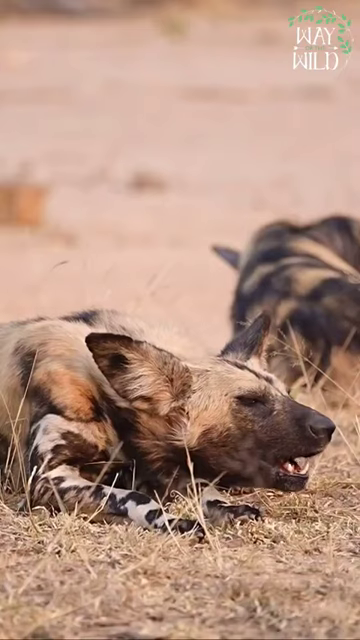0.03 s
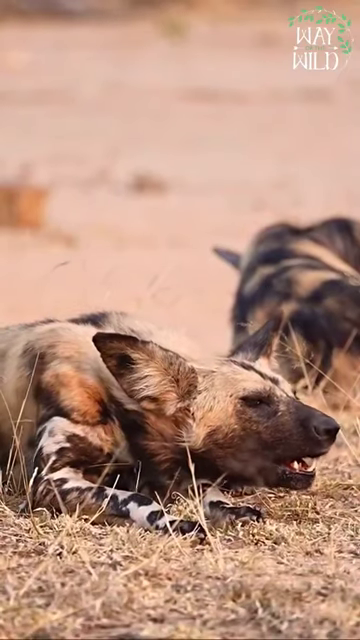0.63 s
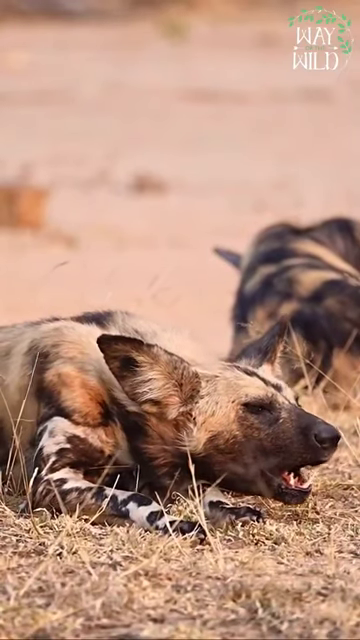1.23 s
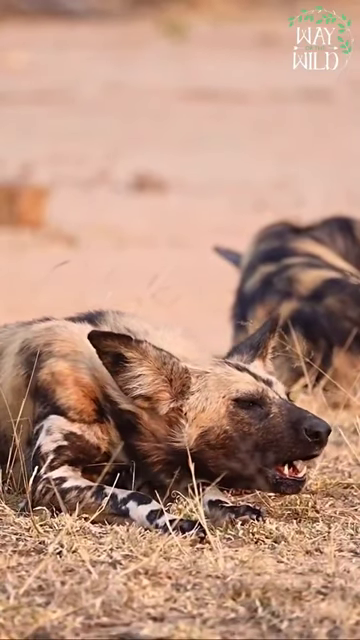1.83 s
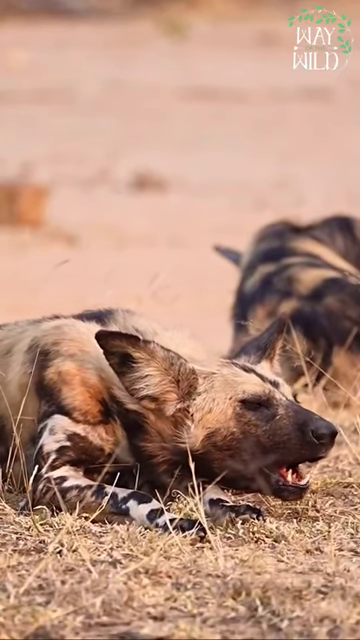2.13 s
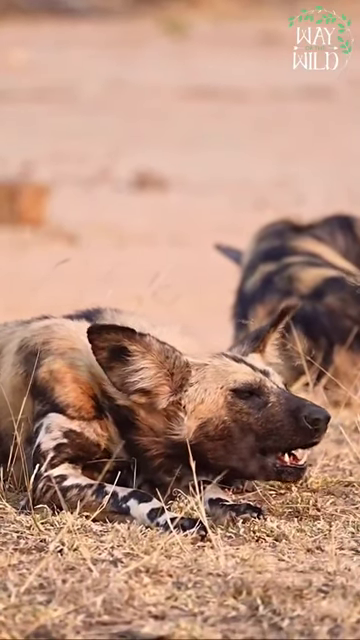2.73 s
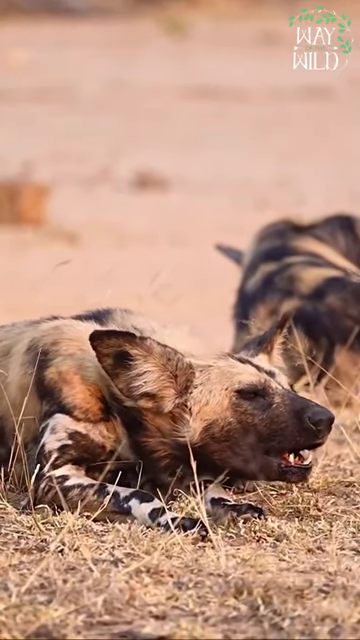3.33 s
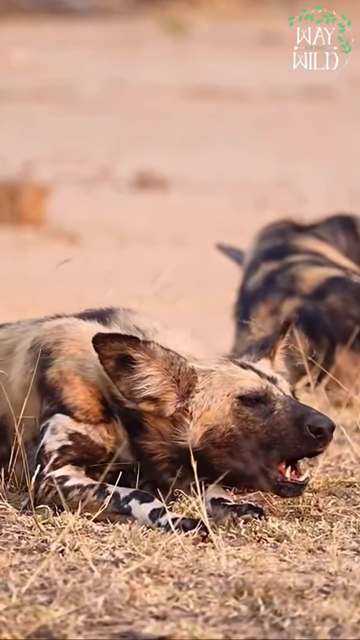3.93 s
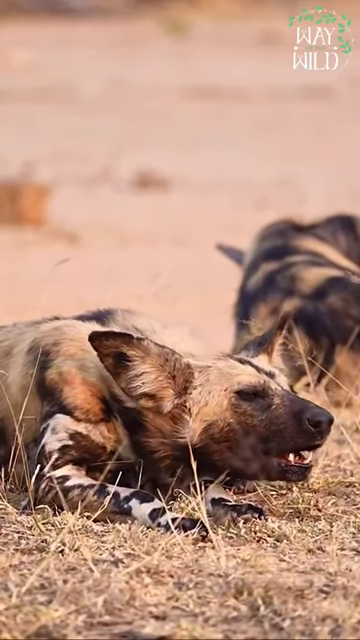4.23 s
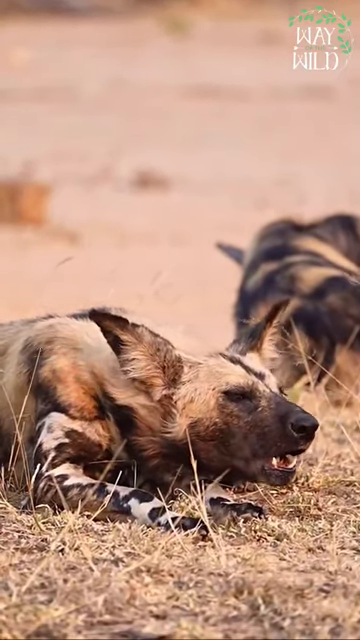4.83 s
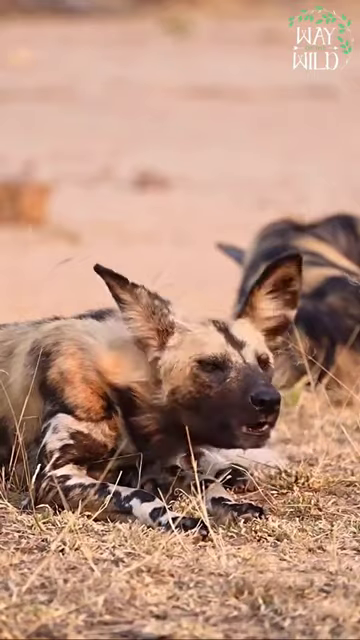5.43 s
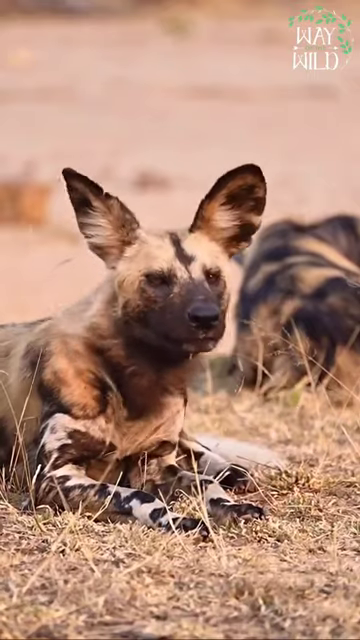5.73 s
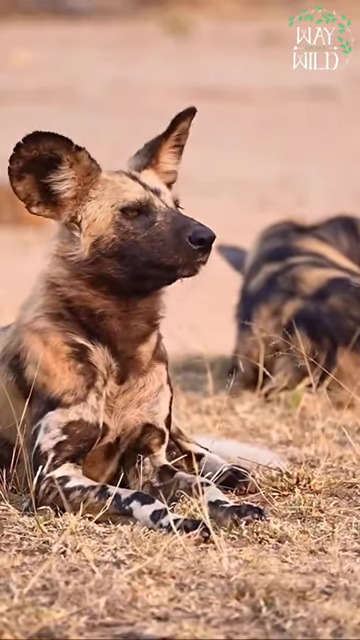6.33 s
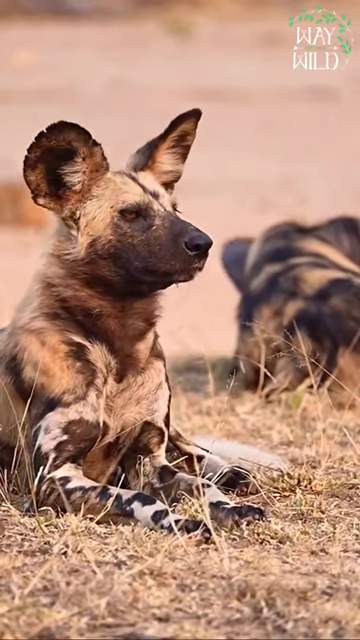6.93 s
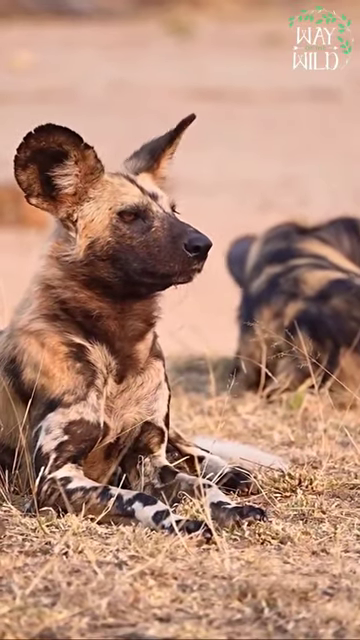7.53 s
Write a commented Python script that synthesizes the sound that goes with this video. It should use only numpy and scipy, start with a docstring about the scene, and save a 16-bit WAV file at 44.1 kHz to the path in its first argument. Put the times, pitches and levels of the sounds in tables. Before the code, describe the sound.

A wild dog gives six clear, evenly spaced hoots over low outdoor rumble, then whines briefly, leaving faint birds and a distant dove.

```python
"""Over a low rumble of bush air, we come in on a wild dog in mid-hoot, lying in dry grass, muzzle low. It hoots
six times: its vocal folds tighten into an arched, nearly pure tone with a thin reedy edge, then let go with a
puff and nasal squeaks. The bush echoes it; small birds call and dry stalks snap. After the softer last hoot it
whines and sits up in a faint swell of rustling. At about 5.9 s the background quickly gives way to a stiller
bed under the small birds and a far dove."""
import sys
import numpy as np
from scipy import signal
from scipy.fft import rfft, irfft, next_fast_len
from scipy.io import wavfile
from scipy.ndimage import uniform_filter1d

SR = 44100
rng = np.random.default_rng(int(sys.argv[2]) if len(sys.argv) > 2 else 0)


def unload_wav(signal):
    """Save mono or channel-first audio to the path in sys.argv[1] as 16-bit WAV at rate SR, clipped to [-1, 1]."""
    wavfile.write(
        sys.argv[1],
        SR,
        np.round(np.clip(np.atleast_2d(signal).T, -1, 1) * 32767).astype(np.int16),
    )


N = 338247
TIME = np.arange(N) / SR

# noise colours of the bed (air under the hoots, the stiller bed after 5.9 s, drone, rustle): f/Hz, level/dB
AIR_COLOUR = [(20, -5), (50, 4), (85, -7), (170, -3), (260, -12.5), (360, -15.5), (550, -12), (900, -18.5),
              (1400, -11), (1900, -19), (2700, -22.5), (4000, -37), (6500, -40.5), (15000, -42)]
STILL_COLOUR = [(20, -3), (52, 6), (90, -6), (210, 3), (320, -10.5), (510, -18.5), (720, -14.5), (900, -27),
                (1500, -21.5), (2200, -27.5), (3200, -29.5), (4500, -39.5), (8000, -41.5), (15000, -46.5)]
DRONE_COLOUR = [(90, -46), (135, -10.5), (160, -3.5), (190, -15.5), (300, -43.5), (900, -81)]
RUSTLE_COLOUR = [(200, -7.5), (550, 5), (1100, -8.5), (1750, 3.5), (2500, -11), (3400, -8.5), (5000, -21),
                 (7000, -14.5), (9200, -18.5), (10300, -28.5), (15000, -29.5)]
# fader rides (the later, stiller bed, drone coming and going, rustle as the dog gets up): t/s, level/dB
STILL_RIDE = [(5.9, 1), (6.8, 2.5), (7.2, 3), (7.45, 0.5), (7.67, 1)]
DRONE_RIDE = [(.7, -57.5), (.9, -47.5), (1.1, -68.5), (2.6, -66), (3.0, -49), (3.8, -53), (4.2, -53.5),
              (5.9, -71)]
RUSTLE_RIDE = [(0, -70), (2.7, -66), (3.9, -51.5), (4.3, -54), (4.8, -50), (5.25, -44), (5.45, -49.5),
               (5.9, -50.5)]
# stereo placement of the early bed, the later stiller bed and the voice: f/Hz, left minus right/dB
AIR_PAN = [(60, 0.0), (150, 0.0), (380, -2), (950, -1.5), (2380, -5), (5980, -6), (15000, -2.5)]
STILL_PAN = [(60, 0.0), (180, -1.5), (550, -3.5), (1650, -5), (4970, -5), (15000, 0)]
VOICE_PAN = [(600, -3.0), (1200, -3.6), (1800, -7), (2400, -10), (3600, -10), (5400, -13), (7500, -11),
             (13000, -7)]
# noise image, mono in the bass and wide on top: f/Hz, left-right correlation
CORRELATION = [(100, 1), (200, 1), (400, 0.84), (1000, 0.73), (2000, 0.49), (5000, 0.11), (12000, 0.087)]
# dry stalks snapping: t/s, level/dB, time to fall 20 dB/s
STALK_SNAPS = [(2.35, -43.5, 0.046), (3.468, -43, 0.043), (5.495, -41.5, 0.028), (5.595, -49, 0.051),
               (5.65, -45, 0.061)]
# noise colours of a snap, the throat's opening tick and the closing puff: f/Hz, level/dB
SNAP_COLOUR = [(500, -38), (1200, -33), (1650, 13.5), (2300, 2), (3200, 2), (4500, -28), (12000, -25)]
TICK_COLOUR = [(200, -19.5), (750, 4.5), (1400, -13), (3000, -30.5), (16000, -54.5)]
PUFF_COLOUR = [(300, -7), (600, -1), (800, 5), (1100, -11), (1800, -7), (3000, -20.5), (4500, -23.5),
               (5700, -17), (7200, -15.5), (8200, -15.5), (9300, -37), (14000, -20), (16000, -34)]
# reverb tail of the bush: f/Hz, time to fall 60 dB/s
BUSH_DECAY = [(300, 1.0), (600, 0.77), (1800, 0.28), (5000, 0.36), (12000, 0.36)]
# slapback off nearby banks and trunks: delay/s, level/dB
SLAPBACKS = [(.043, -32.5), (.088, -37.5), (.15, -31), (.27, -41.5)]
# a bird's down-slurs, steep and then flattening: t/s, length/s, top f/Hz, level/dB
DOWN_SLURS = [(0.821, .06, 4130, -63.5), (1.047, 0.075, 4110, -50), (1.16, 0.027, 5550, -50.5),
              (1.268, 0.11, 5260, -50), (3.376, .045, 6700, -67), (3.465, 0.036, 5930, -62),
              (3.489, 0.059, 4430, -56), (3.657, 0.065, 4500, -57), (6.279, 0.034, 5620, -51.5),
              (6.302, 0.079, 4670, -56), (6.58, 0.048, 5770, -56), (6.709, 0.025, 5260, -54),
              (6.757, 0.068, 4200, -64), (6.83, 0.027, 5150, -60), (6.921, .03, 4770, -59.5),
              (6.95, .049, 3100, -60), (7.055, 0.048, 5800, -58)]
# its up-slurs: t/s, starting f/Hz, level/dB
UP_SLURS = [(5.95, 4740, -66.5), (6.105, 5000, -68), (6.195, 4900, -66), (6.64, 3700, -62),
            (7.095, 3280, -62)]
# nearly flat piping notes: t/s, length/s, f/Hz, level/dB
PIPING_NOTES = [(0.53, 0.06, 3130, -61), (1.529, 0.035, 6100, -68), (2.359, 0.28, 2600, -57.5),
                (4.127, .053, 5000, -63.5), (4.425, .055, 4950, -62.5), (5.926, 0.28, 3290, -64),
                (6.205, 0.042, 3340, -56), (6.801, 0.043, 3280, -55), (7.186, 0.13, 2600, -59)]
# a far dove's coos: t/s, length/s, level/dB
DOVE_COOS = [(6.021, 0.12, -53.5), (6.202, 0.19, -57), (6.379, .18, -58), (6.599, 0.17, -54),
             (6.763, 0.39, -58), (7.0, 0.33, -56.5)]
# hoots: t/s, length/s, f/Hz, level/dB, scoop/s, release/s, treble trim/dB, squeak/dB, echo send/dB
DOG_HOOTS = [(0.05, 0.37, 600.7, -12, .05, 0.072, -2.5, -58, 0.5),
             (0.959, 0.358, 602.7, -12.3, 0.052, 0.049, 0, -48.5, -1.5),
             (1.839, 0.38, 603.7, -12, 0.056, 0.095, 0, -49, -2),
             (2.781, .372, 608, -11.9, .053, .19, 2.5, -43, 1),
             (3.68, .363, 606, -11, .052, .2, 0.5, -41, 2),
             (4.74, 0.486, 581.3, -18, .056, 0.066, 1.5, -49, -0.5)]
# throat EQ on the overtones, jaws open and nearly shut: f/Hz, level/dB, change across a hoot/dB
JAWS_OPEN = [(1520, -1.5, -1.5), (1800, -24, -3.5), (2395, -38, 7), (3020, -51.5, -1), (3480, -29, -8.5),
             (3720, -42, 1), (5300, -47, 14.5), (5470, -37, 10), (6240, -44.5, 18), (6200, -51.5, -5.5),
             (7630, -66.5, 4.5), (7890, -44, 16.5), (9060, -69.5, -2), (11500, -56, 21.5),
             (15000, -79.5, 15)]
JAWS_SHUT = [(1730, -28.5, 11), (2300, -43, 7), (2980, -48.5, 24), (3500, -32.5, 3), (4020, -48.5, 19),
             (5240, -49, -0.5), (5750, -46, -28), (6500, -40, -42), (6800, -56, 6), (7576, -33, -62),
             (8100, -44, -7.5), (9500, -72.5, 1), (15000, -66, -13)]
# overtone EQ as the folds part near the end of a hoot: f/Hz, level/dB
PARTING_EQ = [(1200, -19), (1800, 1), (3600, -9), (4700, 6.5), (5800, -5), (8000, -2.5), (13000, -1.5)]
# two nasal squeaks per hoot: delay from its end/s, length/s, from f/Hz, to f/Hz, trim/dB
NASAL_SQUEAKS = [(-.002, .013, 7640, 7280, -2.5), (0.013, .016, 6950, 6780, 1.5)]
# longer nasal whines as the dog stops calling: t/s, length/s, from f/Hz, to f/Hz, level/dB
NASAL_WHINES = [(5.201, 0.039, 7680, 7510, -28), (5.22, 0.052, 7200, 6970, -43.5),
                (5.264, 0.053, 7650, 7460, -49), (5.529, 0.071, 1625, 1544, -39.5),
                (5.574, 0.031, 1547, 1576, -37)]

# the folds start slack, low and quiet, then tighten; loudness settles sooner than pitch
SLACK_HZ, SLACK_DB, PITCH_STEEPNESS, LEVEL_STEEPNESS = 484, -34.5, 3.2, 3.6
# breath runs out: pitch and level sag, and the pitch hooks down as the folds part and let go
SAG_S, SAG_SHARE, SAG_DB = 0.044, 0.018, -6.5
HOOK_S, HOOK_SHARE, PARTING_S, PARTING_BLUR_S = 0.012, 0.043, 0.041, 0.01
# the octave swells through the hoot; with open jaws it speaks early, lifted by a mouth resonance
OCTAVE_DB, OCTAVE_SWELL_DB, OCTAVE_SLACK_DB = -33.5, 8, -2.5
MOUTH_HZ, MOUTH_WIDTH_HZ, MOUTH_DB = 1034, 65, 9.5
TREBLE_HZ, OVERTONE_STOP_DB_PER_S = 4500, 499.5


def amp(db):
    """Decibels to gain."""
    return 10 ** (np.asarray(db) / 20)


def unit(x):
    """Scales to rms 1."""
    return x / np.sqrt(np.mean(x ** 2) + 1e-20)


def read(points, hz):
    """A curve's value at hz, on a log-frequency axis."""
    f, value = np.transpose(points)
    return np.interp(np.log(hz + 1), np.log(f + 1), value)


def fader(ride):
    """A fader ride as a gain for every sample."""
    return amp(np.interp(TIME, *np.transpose(ride)))


def add(mix, s, sound):
    """Mixes a sound in at time s."""
    part = mix[..., max(round(s * SR), 0):][..., :sound.shape[-1]]
    part += sound[..., :part.shape[-1]]


def pan(side_db):
    """Left and right gains for a level difference, with mean 1."""
    ratio = amp(np.atleast_1d(side_db))
    return 2 * np.array([ratio, np.ones_like(ratio)]) / (1 + ratio)


def pan_bands(x, placement):
    """Pans a stereo sound band by band."""
    return irfft(rfft(x) * pan(read(placement, np.fft.rfftfreq(N, 1 / SR))), N)


def drift(size, rate_hz):
    """Smooth random wander, rms about 1."""
    length = next_fast_len(size + 4096)
    hz = np.fft.rfftfreq(length, 1 / SR)
    return unit(irfft(rfft(rng.standard_normal(length)) / (1 + (hz / rate_hz) ** 4), length))[:size]


def noise(colour, patchy_db):
    """Coloured stereo noise: steady mono bass under a wide, flickering treble."""
    frames, hz = N // 512 + 5, np.fft.rfftfreq(2048, 1 / SR)
    a, b, c, d, patches = rng.standard_normal((5, frames, len(hz)))
    patches = uniform_filter1d(uniform_filter1d(patches, size=5, axis=0), size=14, axis=1)
    patches = unit(patches) * hz / (hz + 900)
    common = read(CORRELATION, hz)
    left = a + 1j * b
    right = common * left + np.sqrt(1 - common ** 2) * (c + 1j * d)
    spectra = np.array([left, right]) * amp(read(colour, hz) + patchy_db * patches)
    return unit(signal.istft(spectra.swapaxes(1, 2), nperseg=2048, noverlap=1536)[1][:, :N])


def bursts(rows, colour, rise_s):
    """Short hits of coloured noise that rise and die away."""
    envelope, t = np.zeros(N), np.arange(SR // 3) / SR
    for s, db, decay in rows:
        shape = (1 - np.exp(-t / rise_s)) ** 2 * amp(-20 * t / decay)
        add(envelope, s, amp(db) * shape / shape.max())
    return envelope * noise(colour, patchy_db=5.5)


def whistles(rows, waver, waver_hz):
    """Gliding, slightly unsteady sine notes."""
    out = np.zeros(N)
    for s, length, from_hz, to_hz, db in rows:
        size = int(length * SR)
        hz = 1 / np.linspace(1 / from_hz, 1 / to_hz, size) * (1 + waver * drift(size, waver_hz))
        envelope = amp(db) * np.sqrt(2) * signal.windows.tukey(size, .7)
        add(out, s, envelope * np.sin(2 * np.pi * np.cumsum(hz) / SR))
    return out


def falling(s, length, hz, db, octaves_per_s):
    """A row for whistles() that slides down in pitch."""
    return s, length, hz, hz * 2 ** (-octaves_per_s * length), db


def air_bed(air_db=-45.5, hum_hz=54, hum_db=-50, still_db=-45, still_s=5.935, crossfade_s=0.031):
    """Air, a wavering low hum, a drone and rustling, giving way quickly to a second, stiller noise bed."""
    hum_gain = amp(hum_db) * np.sqrt(2) * (1 + 0.29 * drift(N, 5.4))
    hum = hum_gain * np.sin(2 * np.pi * hum_hz * TIME + 0.53 * drift(N, 1.4))
    air = amp(air_db) * noise(AIR_COLOUR, patchy_db=5.0)
    drone = fader(DRONE_RIDE) * noise(DRONE_COLOUR, patchy_db=2.5)
    rustle = fader(RUSTLE_RIDE) * noise(RUSTLE_COLOUR, patchy_db=4.5)
    still = amp(still_db) * fader(STILL_RIDE) * noise(STILL_COLOUR, patchy_db=4.5)
    early = pan_bands(air + hum + drone + rustle, AIR_PAN)
    fade = np.clip((TIME - still_s) / crossfade_s + .5, 0, 1)
    return np.sqrt(1 - fade) * early + np.sqrt(fade) * pan_bands(still, STILL_PAN)


def bush_reverb(send, predelay_s=0.032, correlation=0.96, echoes_per_s=1500):
    """Scattered echoes from trunks and banks, the lows ringing longest."""
    taps = rng.standard_normal((3, SR)) * (rng.random((3, SR)) < echoes_per_s / SR)
    taps *= TIME[:SR] > predelay_s
    taps = np.sqrt(correlation) * taps[2] + np.sqrt(1 - correlation) * taps[:2]
    hz, t, spectra = signal.stft(taps, SR, nperseg=256)
    t60 = read(BUSH_DECAY, hz)[:, None]
    tail = signal.istft(spectra * amp(-60 * t / t60), SR, nperseg=256)[1]
    return signal.fftconvolve(send[None], tail / np.linalg.norm(tail[0]), axes=1)[:, :N]


def twitter(count=26, span_s=(6.05, 7.15), low_hz=3600, high_hz=6600, shortest_s=.035, db=-72):
    """Rows for a flock's faint, loosely spaced chirps, each sweeping up or down."""
    when, length, pitch, sweep = rng.random((count, 4)).T
    hz = low_hz + (high_hz - low_hz) * pitch
    times = np.interp(np.arange(count) + when, (0, count), span_s)
    octaves = 0.39 * (2 * sweep - 1)
    return np.transpose([times, shortest_s * (1 + length), hz, hz * 2 ** octaves, np.full(count, db)])


def birds(echo_db=-6, period_s_per_s=0.0014, rise_s=.042, rise_ratio=1.3, coo_hz=408):
    """Small birds whistle and a dove coos, far enough off to be smeared by echo."""
    notes = [(s, length, hz, 1 / (1 / hz + period_s_per_s * length), db)
             for s, length, hz, db in DOWN_SLURS]
    notes += [(s, rise_s, hz, hz * rise_ratio, db) for s, hz, db in UP_SLURS]
    notes += [falling(*row, octaves_per_s=0.18) for row in PIPING_NOTES]
    coos = [falling(s, length, coo_hz, db, octaves_per_s=0.19) for s, length, db in DOVE_COOS]
    song = whistles([*notes, *twitter()], waver=0.019, waver_hz=300)
    song += whistles(coos, waver=0.014, waver_hz=29.6)
    return pan(-11) * song + amp(echo_db) * bush_reverb(song)


def stalks():
    """Dry stalks snap with a sharp, midrange crack."""
    return bursts(STALK_SNAPS, SNAP_COLOUR, rise_s=0.00033)


def hoot(length, top_hz, db, scoop_s, release_s, treble_db, jaws,
         attack_s=0.016, jitter=.0018, shimmer=0.034, flutter_db=4.0, reedy_db=0.86, breath_db=-50):
    """Vocal folds tighten, swing almost as a sine and let go; a slowly shifting throat EQs the edge."""
    t = np.arange(0, length + release_s, 1 / SR)
    remaining_s, overrun_s = np.maximum(length - t, 0), np.maximum(t - length, 0)
    slack = 1 / (1 + (t / scoop_s) ** LEVEL_STEEPNESS)
    scoop = 1 / (1 + (t / scoop_s) ** PITCH_STEEPNESS)
    sag = np.exp(-remaining_s / SAG_S)
    hook = np.exp(-((t - length) / HOOK_S - 1) ** 2)
    parted = 1 / (1 + np.exp((remaining_s - PARTING_S) / PARTING_BLUR_S))
    progress = np.minimum(t / length, 1) - .5
    hz = (top_hz + (SLACK_HZ - top_hz) * scoop) * (1 - SAG_SHARE * sag - HOOK_SHARE * hook)
    effort_db = db + SLACK_DB * slack + SAG_DB * sag
    phase = 2 * np.pi * np.cumsum(hz * (1 + jitter * drift(len(t), 60))) / SR
    stereo_phase = phase + 2 * np.pi * hz * np.array([[.0001], [0]])  # left leads by 0.1 ms
    voice = pan(read(VOICE_PAN, hz)) * amp(effort_db) * np.cos(stereo_phase)
    mouth = np.exp(-((2 * hz - MOUTH_HZ) / MOUTH_WIDTH_HZ) ** 2)
    onset_db = OCTAVE_SLACK_DB * slack + MOUTH_DB * mouth if jaws is JAWS_OPEN else SLACK_DB * slack
    octave_db = OCTAVE_DB + OCTAVE_SWELL_DB * progress + onset_db + parted * read(PARTING_EQ, 2 * top_hz)
    voice += pan(read(VOICE_PAN, 2 * hz)) * amp(octave_db) * np.cos(2 * stereo_phase)
    throat = np.array(jaws)
    choke_db = OVERTONE_STOP_DB_PER_S * np.maximum(t - length + HOOK_S, 0)
    for k in range(3, 26):
        # higher overtones enter later and flutter more; all choke as the folds let go
        source_db = effort_db + reedy_db - (9 + 6 * k) * scoop + parted * read(PARTING_EQ, k * top_hz)
        source_db += treble_db * (k * top_hz > TREBLE_HZ) - choke_db
        throat_db = read(throat[:, :2], k * hz) + progress * read(throat[:, ::2], k * hz)
        partial_db = source_db + throat_db + flutter_db * np.tanh((k - 2) / 4) * drift(len(t), 13)
        partial = amp(partial_db) * np.cos(k * phase + 2 * np.pi * rng.random())
        voice += pan(read(VOICE_PAN, k * hz)) * partial
    # a little air leaks through the folds on each swing
    voice += pan(-8.5) * amp(effort_db + breath_db) * (1 + np.cos(phase)) * drift(len(t), 1300)
    envelope = np.minimum(t / attack_s, 1) * np.exp(-np.log(1000) * overrun_s / release_s)
    return np.sqrt(2) * voice * envelope * (1 + shimmer * drift(len(t), 98))


def dog(tick_db=-30, tick_decay_s=0.02, puff_db=-27, puff_lead_s=.018, puff_decay_s=0.055,
        reverb_db=-28.5):
    """Five open-jawed hoots and a near-shut one, each with a throat tick, a puff and squeaks, in echo."""
    voice, send, slapback = np.zeros((2, N)), np.zeros(N), np.zeros(N)
    ticks, puffs, squeaks = [], [], []
    jaw_shapes = [JAWS_OPEN] * (len(DOG_HOOTS) - 1) + [JAWS_SHUT]
    for row, jaws in zip(DOG_HOOTS, jaw_shapes):
        start, length, hz, db, scoop_s, release_s, treble_db, squeak_db, send_db = row
        sound = hoot(length, hz, db, scoop_s, release_s, treble_db, jaws)
        add(voice, start, sound)
        add(send, start, amp(send_db) * sound.mean(0))
        end = start + length
        ticks.append((start, db + tick_db, tick_decay_s))
        puffs.append((end - puff_lead_s, db + puff_db, puff_decay_s))
        squeaks += [(end + delay, *glide, squeak_db + trim) for delay, *glide, trim in NASAL_SQUEAKS]
    muzzle = pan(-13.5) * whistles(squeaks + list(NASAL_WHINES), waver=0.0054, waver_hz=400)
    muzzle += pan(-5.5) * bursts(puffs, PUFF_COLOUR, rise_s=0.041)
    muzzle += pan(-5.5) * bursts(ticks, TICK_COLOUR, rise_s=0.0011)
    send += muzzle.mean(0)
    dark_send = signal.lfilter(*signal.butter(1, 1500, fs=SR), send)
    for delay, db in SLAPBACKS:
        add(slapback, delay, amp(db) * dark_send)
    return voice + muzzle + pan(-2.2) * (slapback + amp(reverb_db) * bush_reverb(send))


def scene():
    """The dog up front, with birds, stalks and the air bed behind."""
    return dog() + birds() + stalks() + air_bed()


def record(dry, start_s=0.1975, cutoff_hz=15400):
    """A hard cut in, mid-hoot, then a steep low-pass."""
    lowpass = signal.firwin(511, cutoff_hz, window=("kaiser", 9), fs=SR)
    return signal.oaconvolve(dry * (TIME >= start_s), lowpass[None], "same")


dry = scene()
out = record(dry)
unload_wav(out)
```